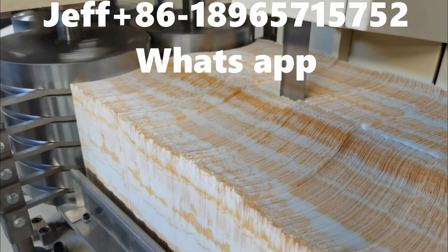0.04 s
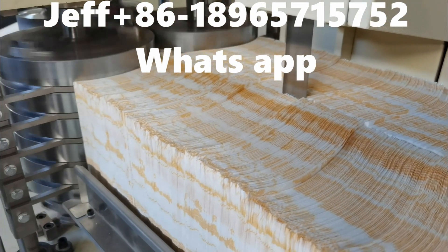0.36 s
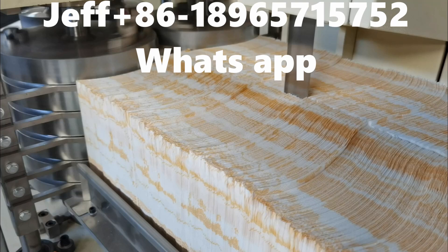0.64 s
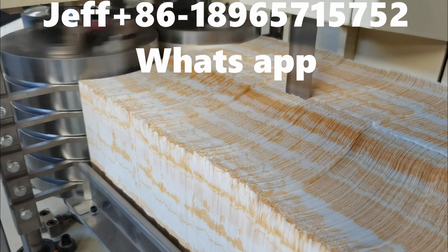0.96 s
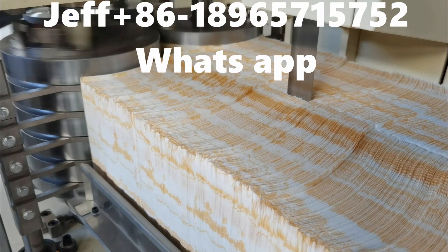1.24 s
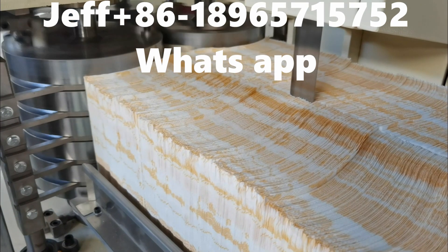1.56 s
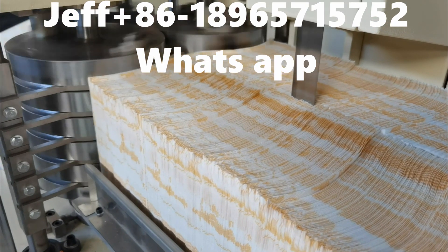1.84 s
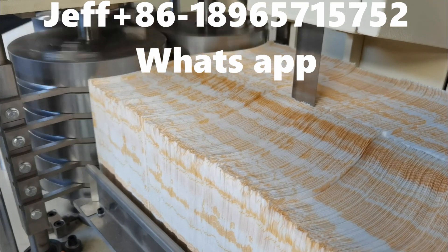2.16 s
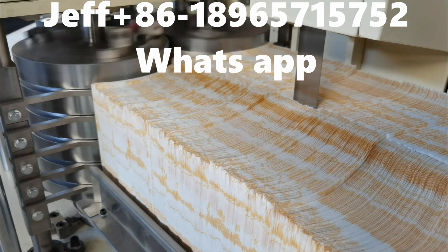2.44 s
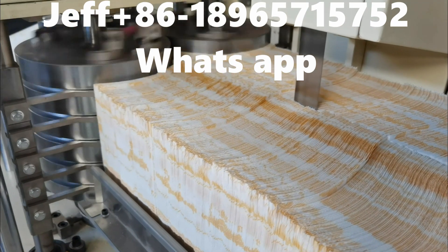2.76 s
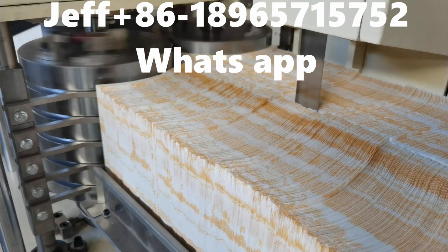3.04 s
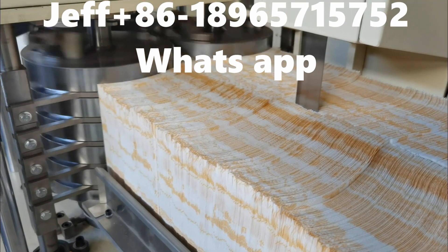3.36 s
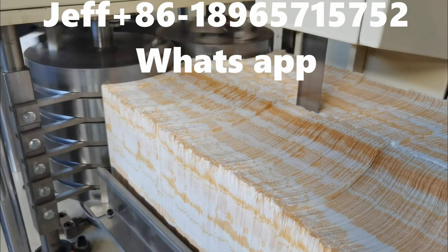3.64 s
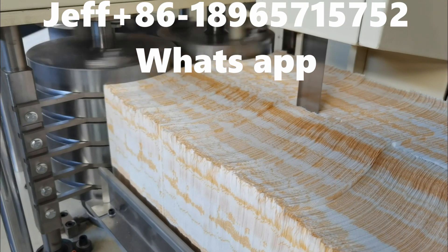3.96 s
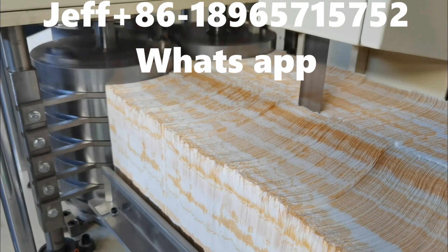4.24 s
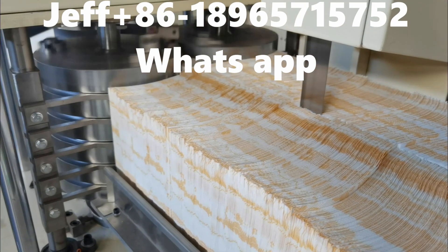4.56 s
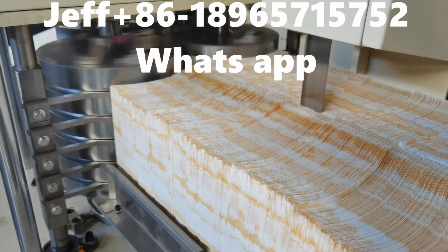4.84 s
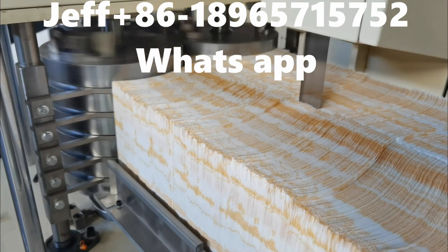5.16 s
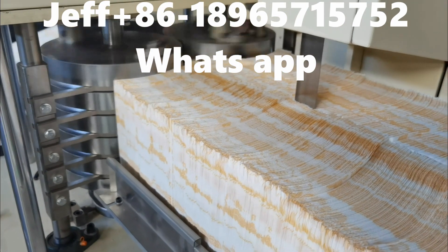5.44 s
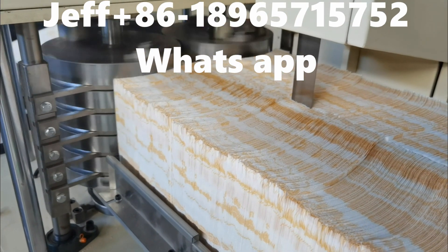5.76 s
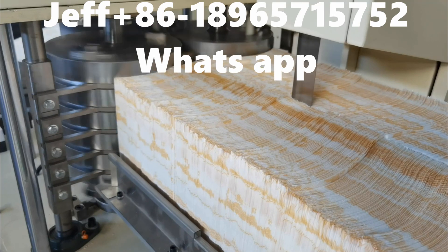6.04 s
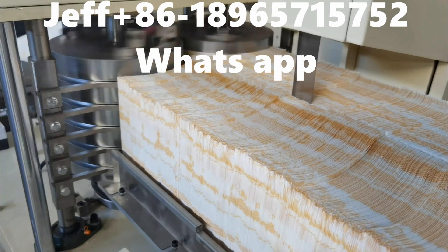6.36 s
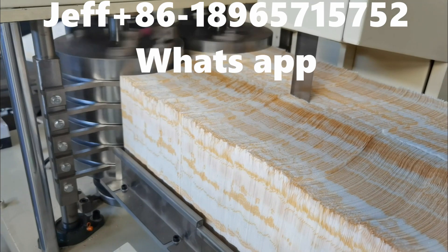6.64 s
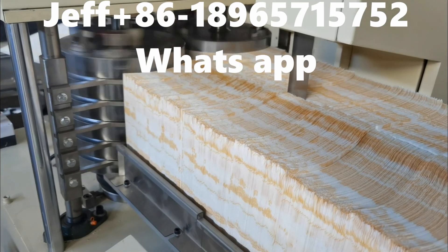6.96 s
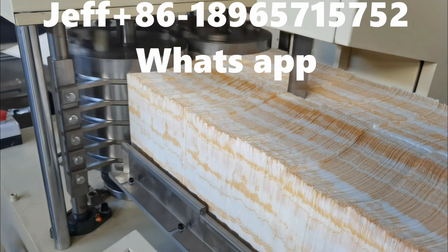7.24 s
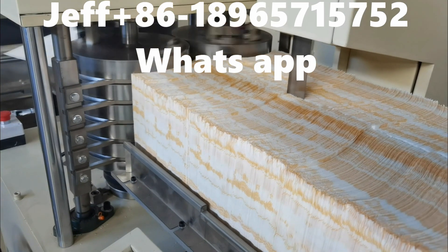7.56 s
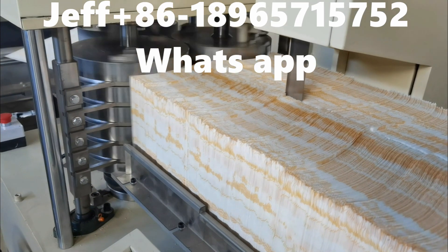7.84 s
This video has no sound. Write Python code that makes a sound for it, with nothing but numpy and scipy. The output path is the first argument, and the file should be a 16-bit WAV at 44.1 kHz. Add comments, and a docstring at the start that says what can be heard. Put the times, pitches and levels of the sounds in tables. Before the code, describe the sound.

A paper folding machine runs steadily with a loud wavering gear whine, rapid regular steel clacks, hissing paper and a low rumble.

```python
"""In a workshop, a paper napkin folding machine runs steadily, half a metre from a phone.
A gear whines, wavering with its off-centre wheels. Every turn of the folding drums brings the same
steel clacks, a ping and soft thumps on the napkin stack. The paper hisses over guides that sometimes
squeak, the rollers rumble, a low gear hums and the motor sings thinly. Behind it all,
the dull wash of the hall grows towards the end."""
import sys
import numpy as np
from scipy import signal
from scipy.fft import rfft, irfft, next_fast_len
from scipy.io import wavfile
from scipy.ndimage import uniform_filter1d

SR = 44100
rng = np.random.default_rng(int(sys.argv[2]) if len(sys.argv) > 2 else 0)


def master_out(mix):
    """Clip the mix to full scale and print it as 16-bit PCM to the path in sys.argv[1]."""
    frames = np.transpose(np.atleast_2d(mix))
    ceiling = np.clip(frames, -1, 1)
    pcm = np.round(ceiling * 32767).astype(np.int16)
    wavfile.write(sys.argv[1], SR, pcm)


N = 348390
TIME = np.arange(N) / SR
TURN_S = .259572  # one turn of the folding drums


# The off-centre wheels. Each row: turns per second, relative pitch swing, level swing in dB,
# time of one peak in seconds.
WHEELS = [(5.137, 22, .45, .086), (3.8525, 14.5, 0, .200), (4.110, 10.5, .55, .201), (10.274, 3.5, 0, .085)]
# The teeth go slack. Each row: time in seconds, dip in dB before limiting, half-length in seconds.
TOOTH_SLACKS = [(0.017, 4, 0.023), (0.326, 8, .015), (0.379, 12, 0.012), (.575, 8, 0.046), (0.805, 8, .018),
                (1.36, 10, .018), (1.54, 6, .014), (1.779, 9, 0.013), (1.977, 4, .014), (2.26, 7, 0.013),
                (2.33, 6, 0.012), (2.683, 7, .014), (2.742, 7, .025), (3.054, 8, .014), (3.172, 7, 0.01),
                (3.495, 4, .03), (3.696, 9, 0.033), (3.908, 9, .022), (4.01, 7, .014), (4.075, 6, 0.013),
                (4.204, 6, .014), (4.271, 6, .025), (4.491, 6, .025), (4.762, 2, 0.013), (5.405, 5, .03),
                (5.59, 6, .03), (5.793, 13, 0.017), (6.904, 6, .016), (6.953, 5, 0.012), (7.19, 7, .016),
                (7.273, 5, 0.019), (7.37, 3, 0.022), (7.58, 8, .025), (7.632, 2, .014), (7.71, 8, 0.02),
                (7.798, 6, 0.024)]
# The teeth bite hard. Each row: time in seconds, rise in dB.
TOOTH_BITES = [(.159, 3.5), (.219, 6), (.697, 0), (.885, 4), (1.609, 2.5), (2.216, 3), (2.58, 2.5),
               (3.305, 5), (3.625, 2), (4.11, 5), (4.393, 3), (5.321, 3), (5.544, 5), (5.825, 6),
               (6.007, 5.5), (6.373, 6), (6.796, 7), (7.035, 4.5), (7.101, 4), (7.159, 8), (7.501, 6),
               (7.768, 10), (7.886, 5)]

def gear_motion(slack_limit_db=10, pulse_db=1):
    """The wheels swing the gear's pitch and level; slack teeth dip the level and biting teeth lift it."""
    turns = [(swing, db, wave(rate, peak_s)) for rate, swing, db, peak_s in WHEELS]
    swing_hz = 1.02 * sum(swing * turn for swing, _, turn in turns)
    slack_db = sum(db * bump(s, half_s) for s, db, half_s in TOOTH_SLACKS)
    slack_db = slack_limit_db * np.tanh(slack_db / slack_limit_db)  # the teeth never part entirely
    load_db = sum(db * turn for _, db, turn in turns) - slack_db
    load_db += pulse_db * wave(4 * WHEELS[2][0], peak_s=.038)  # four pulses per turn of the third wheel
    load_db += sum(db * bump(s, half_s=.012) for s, db in TOOTH_BITES)
    return swing_hz, load_db, slack_db


# How loud the whine is. Each row: time in seconds, level in dB.
WHINE_LEVEL = [(0.0, -20), (0.5, -20.5), (1.1, -20.5), (2.3, -20.5), (3.3, -20.5), (4.0, -22), (5.6, -23.5),
               (6.4, -22), (6.9, -23), (7.45, -25.5), (7.9, -25.5)]

def gear_whine(mesh_hz=2082, left_lead_db=8):
    """Gear teeth meet so fast that they make a tone, with a raspy overtone an octave above."""
    swing_hz, load_db, slack_db = gear_motion()
    # the first clack of each turn jolts the teeth apart for a moment
    knocks = each_turn(CLACKS[0][0], scatter_db=2, jitter_s=.001)
    jolt = np.minimum(fade(knocks, decay_s=.018), 1)
    # uneven teeth roughen the tone and make it flutter
    roughness = .12 * wander(450) + .2 * wander(100) + (.7 * jolt + .06 * slack_db) * wander(300)
    phase = 2 * np.pi * np.cumsum(mesh_hz + swing_hz + 4 * wander(25)) / SR + roughness
    contact = np.clip(1 + .26 * wander(190), 0, 1.35) * (1 - .25 * jolt)
    tone = np.sin(phase) * contact * gain(wander(400) + load_db)
    # the left microphone faces the gear; the right one hears more of the echoes
    echoes = (room(tone, t60_s=.3, wet_db=-14, lag_s=0) - tone) * gain([[-2.5], [0]])
    main = np.array([tone, delay(tone, .00032) * gain(-16)]) + echoes
    main /= np.std(main, axis=1, keepdims=True)
    main *= gain([[left_lead_db / 2], [-left_lead_db / 2]])
    # the overtone keeps breaking off, more deeply as time goes on
    flicker_db = (3 + .3 * TIME) * np.minimum(wander(55), .3) + load_db / 3
    overtone = spread([np.sin(2 * phase + .56 * wander(280)) * gain(flicker_db + 1.2 * wander(600))
                       for _ in range(2)])
    overtone_db = -15.7 + .2 * TIME
    return gain_curve(WHINE_LEVEL) * (unit(main) + gain(overtone_db) * unit(overtone))


# The gripper and cam blows of one turn. Each row: start in seconds into the turn, strength in dB,
# rattle fade time in seconds, ring pitch in Hz, ring level in dB compared with the rattle.
CLACKS = [(0.063, -20, 0.0085, 2860, -13), (0.067, -23, 0.012, 8700, -7), (0.076, -27, 0.015, 8500, -30),
          (0.093, -32, 0.0023, 10460, -1.5), (.103, -29.5, 0.0026, 8700, -11),
          (0.150, -22.5, 0.0036, 6500, -13), (0.152, -33, 0.0039, 3150, -35),
          (0.1933, -20.3, 0.009, 9150, -12), (.200, -26, 0.012, 4580, -17),
          (0.210, -26, 0.0026, 4320, -0.5), (0.219, -32.5, 0.016, 2930, -3)]
# The tone colour of rattling steel. Each row: frequency in Hz, level in dB.
STEEL_COLOUR = [(500, -14.5), (1600, -13.5), (2600, -2.5), (3100, -5.5), (3700, -9.5), (4800, -3),
                (5400, -8.5), (7400, -3), (8400, 2), (9400, 2), (10200, -8), (11300, -21), (13000, -20),
                (15000, -58)]

def gripper_clacks(frame_db=-10, frame_decay_s=.053):
    """Each blow is a short rattle of steel that rings its own part and dies away in the frame."""
    rattle, rings = 0, 0
    for s, db, decay_s, ring_hz, ring_db in CLACKS:
        push = gain(db) * each_turn(s, scatter_db=.5, jitter_s=.00077)
        push = uniform_filter1d(push, size=270)  # paper between the parts cushions the blow
        contact = fade(push, decay_s) * unit(gain(1.3 * wander(2500) + 1.2 * wander(300)))
        frame = gain(frame_db) * fade(push, frame_decay_s)
        blow = np.hypot(contact, frame) * noise()
        rattle += blow
        rings += gain(ring_db) * np.std(blow) * unit(resonance(blow, ring_hz, width_hz=800))
    steel = np.std(rattle) * unit(colour(rattle, STEEL_COLOUR))
    return spread(sheet_flap(steel + rings))


def sheet_flap(x, depth_db=.9):
    """The loose sheet flaps over the steel, so three bands of the sound each flutter on their own."""
    low, low_and_middle = below(x, hz=4000), below(x, hz=7000)
    bands = low, low_and_middle - low, x - low_and_middle
    return sum(band * gain(depth_db * wander(70)) for band in bands)


# A steel finger snaps back once a turn. Each row: start in seconds, strength in dB.
FINGER_SNAPS = [(.101, -46), (.361, -45), (.621, -41.5), (.88, -41), (1.14, -46), (1.399, -43),
                (1.659, -44), (1.919, -42), (2.178, -41), (2.438, -42), (2.697, -41), (2.957, -49),
                (3.216, -36), (3.476, -40), (3.735, -37), (3.995, -41), (4.255, -37.5), (4.514, -36.5),
                (4.774, -38), (5.034, -41), (5.293, -41), (5.553, -38), (5.812, -40), (6.072, -41),
                (6.331, -38), (6.591, -39), (6.85, -42), (7.11, -49), (7.37, -44), (7.629, -41)]
# The finger's ringing tones. Each row: pitch in Hz, relative level in dB,
# seconds to fade by 60 dB, rasp (phase wobble) in radians.
FINGER_TONES = [(5840, 10, 0.15, .4), (5697, 7.5, 0.26, .15), (6100, 3, .08, .8), (6450, 4.5, 0.054, .8),
                (7770, 16.5, 0.061, 0.69), (9000, 14, .06, 0.86), (9200, 12.5, 0.12, 0.56)]

def finger_ping(pick_up_s=.097, pick_up_db=-6, settle_s=.0014):
    """The finger rings as it hits its stop, then more softly when the next gripper picks it up."""
    times, force_db = np.transpose(FINGER_SNAPS)
    times = np.r_[times, times + pick_up_s]
    force_db = np.r_[force_db, force_db + pick_up_db]
    seated = 1 - np.minimum(fade(pushes_at(times, np.zeros(len(times))), settle_s), 1)
    pushes = pushes_at(times, force_db)
    tones = [(gain(db) * ring(pushes, hz, t60 / np.log(1000)), rasp)
             for hz, db, t60, rasp in FINGER_TONES]
    pair = []
    for _ in range(2):
        flutter = gain(2.5 * wander(400))
        ping = sum(wobble(tone, rasp * wander(400) + np.pi * wander(4)) for tone, rasp in tones)
        pair.append(seated * flutter * ping)
    return spread(pair)


# The soft pats of one turn. Each row: start in seconds into the turn, pitch in Hz, level in dB,
# fade time in seconds, level change in dB when the two slowest wheels are in step.
SOFT_PATS = [(0.04, 182, -28, 0.015, 3.5), (.057, 520, -31.5, .008, 0), (0.072, 180.6, -27, 0.023, -5),
             (.105, 233, -28.5, 0.0049, 7.5), (.160, 461, -27, 0.029, -1.5), (0.173, 240, -26, .010, -3.5),
             (.195, 560, -27, 0.018, 1), (0.209, 256, -36.5, 0.034, -2)]
# Now and then an arm lands hard. Each row: start in seconds, pitch in Hz, peak level in dB.
HARD_PATS = [(.554, 191, -17.5), (3.927, 183, -22), (4.188, 180, -19), (4.305, 275, -24), (4.446, 188, -24),
             (5.345, 167, -23), (7.562, 181, -19), (7.822, 182, -21)]

def arm_thumps(in_step_s=4.15, hard_rise_s=.006):
    """The packing arms pat the stack; their force shifts as the wheels drift in and out of step."""
    in_step = wave(WHEELS[2][0] - WHEELS[1][0], in_step_s)
    soft, hard = 0, 0
    for s, hz, db, decay_s, change_db in SOFT_PATS:
        pushes = each_turn(s, scatter_db=2, jitter_s=.00062)
        soft += gain(db + change_db * in_step) * ring(pushes, hz, decay_s)
    for s, hz, db in HARD_PATS:
        # the stack gives way under a hard pat, so it swells before it dies
        pat = ring(pushes_at(s, db), hz, hard_rise_s)
        hard += ring(pat, hz, hard_rise_s) * np.e / (hard_rise_s * SR)
    return wobble(soft + hard, .61 * wander(60))


# How loud the sliding paper is. Each row: time in seconds, level in dB.
PAPER_LEVEL = [(0, -26.5), (.7, -27.5), (1.4, -27), (2.7, -28), (3.3, -26.5), (3.8, -27), (4.7, -26),
               (5.6, -27.5), (5.85, -25), (6.1, -25.5), (6.3, -27), (6.7, -27), (7.2, -27), (7.9, -27.5)]
# The tone colour of its hiss. Each row: frequency in Hz, level in dB.
PAPER_COLOUR = [(700, -22.5), (1200, -12.5), (1600, -7), (2600, -3), (3000, -6), (3600, -14.5), (4800, -11),
                (5400, -10.5), (6400, -5.5), (6950, -13), (7400, -6), (8100, -1.5), (8350, 6), (9300, -3),
                (11300, -26.5), (13300, -18), (15000, -64)]

def paper_hiss(creases_per_s=420, crinkle_db=-6):
    """The long sheet slides over steel guides; it billows and flutters, and tiny creases snap in it."""
    creases = (rng.random(N) < creases_per_s / SR) * gain(rng.standard_normal(N))
    crinkle = gain(crinkle_db) * unit(fade(creases, decay_s=.00063))
    flutter = gain(wander(14) + 1.35 * wander(70))
    rustle = gain(.25 * wander(900))
    drag = flutter * np.hypot(rustle, crinkle)
    return gain_curve(PAPER_LEVEL) * spread(unit(colour(noise() * drag, PAPER_COLOUR)))


# The tone colour of the rumble. Each row: frequency in Hz, level in dB.
ROLLER_COLOUR = [(25, -26), (62, -50), (80, -17.5), (98, -2), (130, -2), (160, 1.5), (190, -1), (230, -1.5),
                 (295, 1), (370, -8.5), (450, -4.5), (560, -7), (780, -17.5), (950, -15), (1250, -24)]
# Its deep bass comes and goes. Each row: time in seconds, level change in dB.
BASS_LEVEL = [(0, 1), (.8, 0), (1.7, 0), (3.2, -1), (4, 0), (5.3, -0.5), (5.7, -2.5), (7.2, -3.5),
              (7.9, -2.5)]

def roller_rumble(shake_db=2, top_hz=1400, bass_hz=200):
    """The same bumps pass the rollers on every turn, mixed with loose shaking."""
    bumps = rng.standard_normal((2, round(TURN_S * SR)))
    shake = bumps[:, np.arange(N) % bumps.shape[1]] + gain(shake_db) * noise()
    body = signal.sosfilt(signal.butter(4, top_hz, fs=SR, output="sos"), colour(shake, ROLLER_COLOUR))
    rumble = spread(unit(body) * gain(wander(25)))
    return rumble + below(rumble, bass_hz) * (gain_curve(BASS_LEVEL) - 1)


# The tones of the hum. Each entry: relative level in dB, for 1, 2 and 3 times its pitch.
HUM_TONES = [0, -11.5, -13]
# How loud the hum is. Each row: time in seconds, level in dB.
HUM_LEVEL = [(0, -39.5), (.65, -38.5), (1.0, -35), (1.75, -34), (2.15, -35), (2.35, -34.5), (2.95, -37),
             (3.5, -36), (4.3, -35.5), (4.5, -36), (4.88, -33.5), (5.09, -37.5), (5.3, -36), (5.66, -31),
             (5.87, -39.5), (6.3, -37), (6.85, -41), (7.9, -44)]

def gear_hum(hz=489, swell_db=8.5, blur_rad=.91):
    """A low gear on the first wheel bites harder once in each of its turns; its overtones are blurred."""
    bite = wave(WHEELS[0][0], peak_s=.027)
    phase = 2 * np.pi * np.cumsum(hz + 3 * bite + 7 * wander(70)) / SR
    tone = sum(gain(db + 2 * wander(60)) * np.sin((k + 1) * phase + k * blur_rad * wander(150))
               for k, db in enumerate(HUM_TONES))
    hum = room(tone * gain(swell_db * bite), t60_s=.15, wet_db=-12, lag_s=.0001)
    return gain_curve(HUM_LEVEL) * unit(hum)


# The dry guides squeak. Each row: start in seconds, pitch in Hz, strength in dB, fade time in seconds.
SQUEAKS = [(4.562, 4380, -33, .014), (5.339, 4460, -27, 0.0072), (6.585, 9120, -20.5, 0.028),
           (6.64, 4500, -31, .009), (6.85, 9260, -21.5, 0.018), (7.11, 9200, -26, 0.021),
           (7.228, 4440, -30, .009), (7.45, 4330, -32, .009), (7.675, 4370, -30, .009)]

def guide_squeaks(rasp_rad=.53, rise_s=.0029):
    """Steel rubs on steel in short, rough squeals."""
    tone = sum(fade(pushes_at(s, db), decay_s) * np.exp(2j * np.pi * hz * TIME)
               for s, hz, db, decay_s in SQUEAKS)
    swell = fade(np.abs(tone), rise_s) / (rise_s * SR)
    return 2 * swell * np.sin(np.angle(tone) + rasp_rad * wander(500))


# The motor's high tones. Each row: pitch in Hz, level in dB.
MOTOR_TONES = [(7148, -54.5), (7230, -48), (7396, -52.5), (7876, -49), (7958, -46), (8041, -50),
               (8124, -48), (8522, -47), (8605, -48)]

def motor_song():
    """The drive switches the current on and off, and the motor windings sing thinly."""
    return sum(gain(db + 2.4 * wander(4)) * np.sqrt(2) * np.sin(2 * np.pi * hz * TIME)
               for hz, db in MOTOR_TONES)


# The hall gets briefly louder. Each row: time in seconds, rise in dB, half-length in seconds.
HALL_SURGES = [(6.25, 4, .3), (7.45, 3.5, .3)]

def hall_wash(centre_hz=760, width_hz=600, rise_from_s=5.4, rise_db_per_s=2.8):
    """Dull noise from the rest of the hall, growing and surging towards the end."""
    rise_db = rise_db_per_s * np.maximum(TIME - rise_from_s, 0)
    rise_db += sum(db * bump(s, half_s) for s, db, half_s in HALL_SURGES)
    wash = resonance(resonance(noise(), centre_hz, width_hz), centre_hz, width_hz)
    return unit(wash) * gain(rise_db + 1.8 * wander(18))


# How wide the room sounds. Each row: frequency in Hz, side level compared with the middle in dB.
ROOM_WIDTH = [(60, -11), (130, -18.5), (250, -11), (500, -7.5), (1000, 1), (3000, 0.5), (6000, -1),
              (8500, -7.5), (13000, 0)]

def spread(pair):
    """Mix two sounds to left and right: alike in the bass, wider higher up."""
    return pair[0] + np.array([[1], [-1]]) * colour(pair[1], ROOM_WIDTH)


def room(x, t60_s, wet_db, lag_s):
    """The direct sound reaches the right microphone lag_s late; echoes come from all round."""
    t = TIME[:SR // 2]
    tail = rng.standard_normal((2, len(t))) * np.exp(-np.log(1000) * t / t60_s)
    tail /= np.sqrt(np.sum(tail ** 2, axis=1, keepdims=True))
    direct = np.array([x, delay(x, lag_s)])
    return direct + gain(wet_db) * signal.fftconvolve(x[None], tail, axes=1)[:, :N]


def each_turn(at_s, scatter_db, jitter_s):
    """One push a turn, never quite the same in force or timing."""
    chance = rng.standard_normal((int(N / SR / TURN_S) + 1, 2))
    where = ((at_s + TURN_S * np.arange(len(chance)) + jitter_s * chance[:, 0]) * SR).astype(int)
    inside = (where >= 0) & (where < N)
    return np.bincount(where[inside], gain(scatter_db * chance[inside, 1]), N)


def pushes_at(times, db):
    """Single pushes at given times."""
    return np.bincount((np.atleast_1d(times) * SR).astype(int), np.atleast_1d(gain(db)), N)[:N]


def ring(pushes, hz, decay_s):
    """Each push starts a fading tone, kept as a complex wave."""
    pole = np.exp((2j * np.pi * hz - 1 / decay_s) / SR)
    return signal.lfilter([1], [1, -(pole if hz else pole.real)], pushes + 1e-18)


def fade(pushes, decay_s):
    """Each push dies away without a pitch."""
    return ring(pushes, 0, decay_s).real


def wobble(tone, radians):
    """Shift a complex wave's phase and return it as plain sound."""
    return (tone * np.exp(1j * radians)).imag


def wave(hz, peak_s):
    """A steady swing between -1 and 1."""
    return np.cos(2 * np.pi * hz * (TIME - peak_s))


def bump(s, half_s):
    """A smooth rise and fall round a moment."""
    return np.exp(-np.minimum(((TIME - s) / half_s) ** 2, 20))


def wander(per_s):
    """A smooth random curve, about 1 in size."""
    k = max(int(SR / per_s), 1)
    steps = np.repeat(rng.standard_normal(N // k + 1), k)
    return unit(uniform_filter1d(uniform_filter1d(steps, k), k)[:N])


def noise():
    """Two unrelated white noises."""
    return rng.standard_normal((2, N))


def colour(x, points, power=1):
    """Shape the tone colour with (Hz, dB) points."""
    hz, db = np.transpose(points)
    size = next_fast_len(N + 4096)
    f = np.maximum(np.arange(size // 2 + 1) * SR / size, 1)
    shape = gain(power * np.interp(np.log(f), np.log(hz), db))
    return irfft(rfft(x, size) * shape, size)[..., :N]


def resonance(x, hz, width_hz):
    """Keep a band round one pitch."""
    return signal.lfilter(*signal.iirpeak(hz, hz / width_hz, fs=SR), x)


def below(x, hz):
    """Keep what lies below a frequency."""
    return signal.sosfiltfilt(signal.butter(4, hz, fs=SR, output="sos"), x)


def delay(x, s):
    """The same sound, s seconds later."""
    return np.interp(TIME - s, TIME, x)


def gain(db):
    """Turn decibels into a multiplier."""
    return np.exp(np.asarray(db) * (np.log(10) / 20))


def gain_curve(table):
    """Join (seconds, dB) points into one multiplier a sample."""
    return gain(np.interp(TIME, *np.transpose(table)))


def unit(x):
    """Scale to an average (rms) size of 1."""
    return x / np.sqrt(np.mean(x ** 2))


# The two microphones colour the sound. Each row: frequency in Hz, left level minus right in dB.
MIC_COLOUR = [(200, 0.3), (450, 3), (1000, 0.5), (2000, 5.5), (3300, -6), (4400, -4.5), (6300, -2.5),
              (7200, -11.5), (8100, -5.5), (8600, -8.5), (9100, 3.5), (10300, 6), (14000, 0.5)]

def scene(roller_db=-28.5, hall_db=-44, swell_period_s=4.5):
    """The machine and the hall, heard by the phone's left and right microphones."""
    swell = wave(1 / swell_period_s, peak_s=4.43)  # rollers and hall swell slowly together
    low = gain(roller_db + .75 * swell) * roller_rumble() + gear_hum() + arm_thumps()
    high = paper_hiss() + gripper_clacks() + finger_ping() + guide_squeaks() + motor_song()
    left, right = low + high + gain(hall_db + 1.5 * swell) * hall_wash()
    return np.array([colour(left, MIC_COLOUR, .5), colour(right, MIC_COLOUR, -.5)]) + gear_whine()


def record(dry, low_cut_hz=80, top_hz=15100):
    """The phone cuts the deep bass and the highest treble."""
    dry = signal.sosfilt(signal.butter(3, low_cut_hz, "high", fs=SR, output="sos"), dry)
    return signal.sosfilt(signal.ellip(8, .2, 70, top_hz, fs=SR, output="sos"), dry)


dry = scene()
out = record(dry)
master_out(out)
```